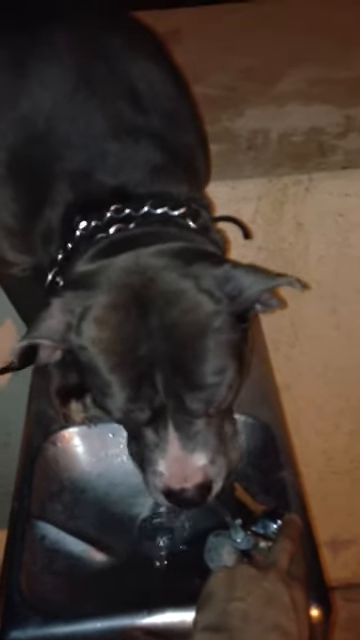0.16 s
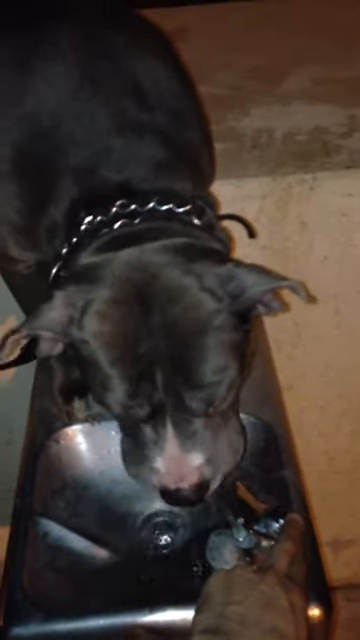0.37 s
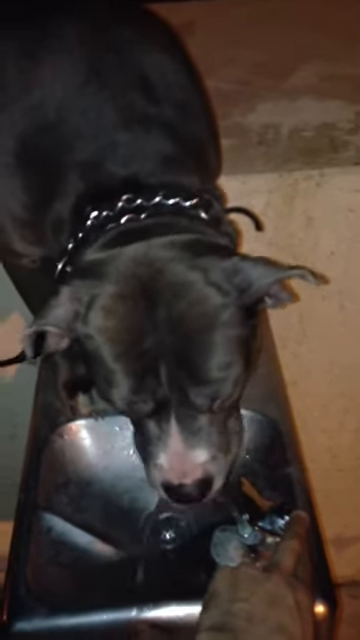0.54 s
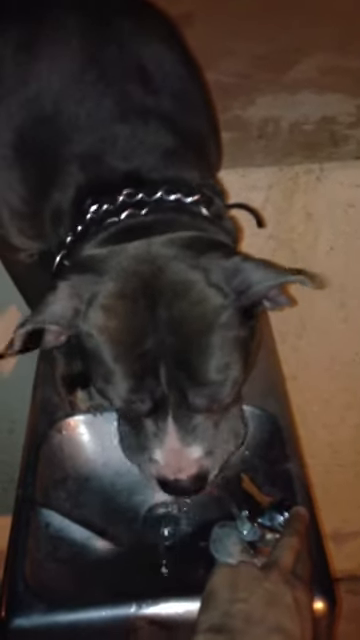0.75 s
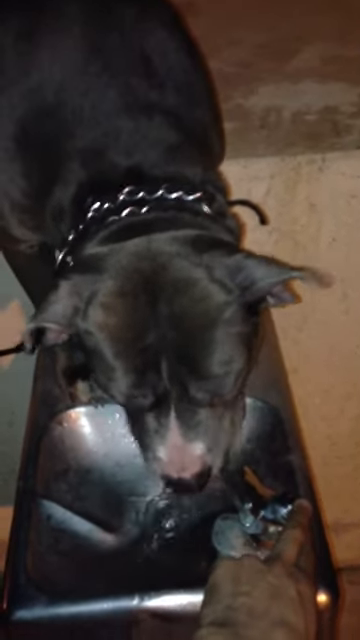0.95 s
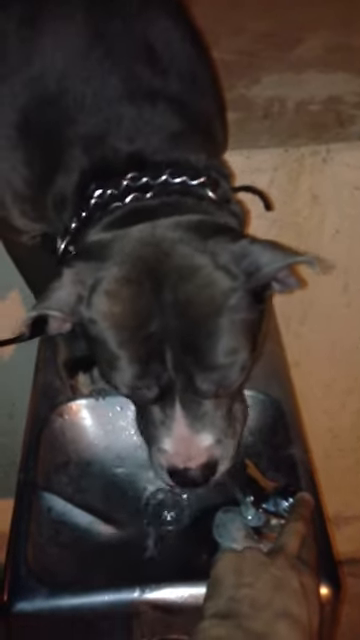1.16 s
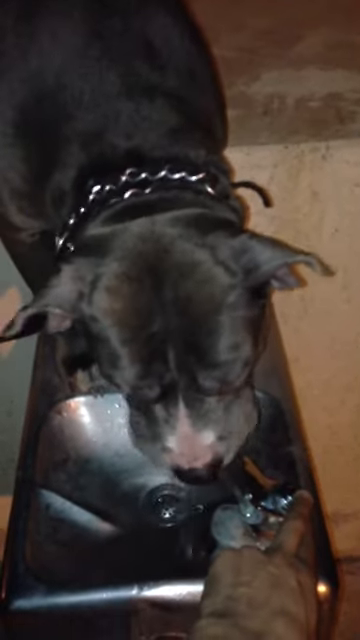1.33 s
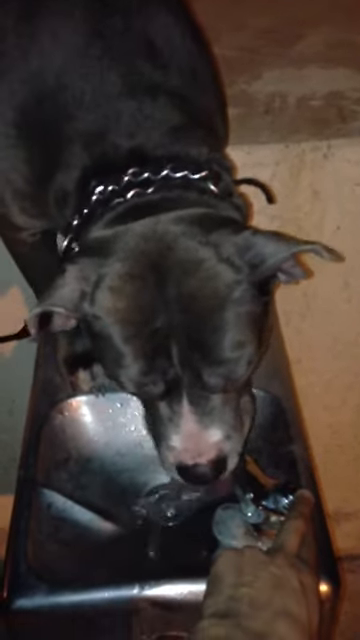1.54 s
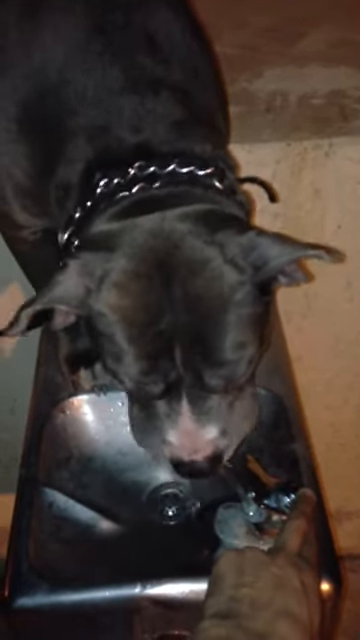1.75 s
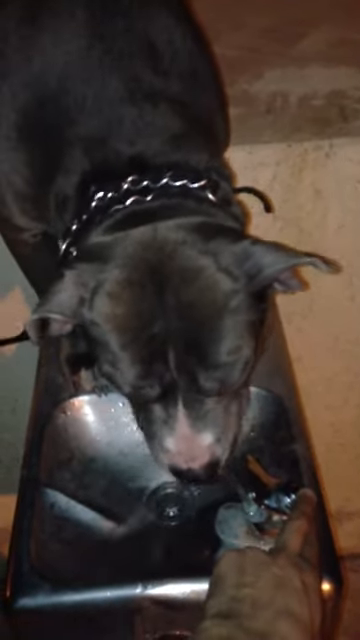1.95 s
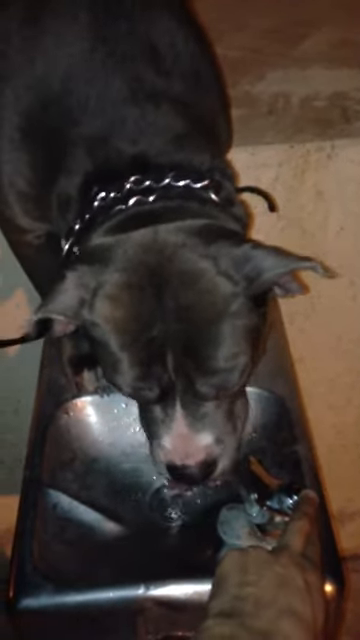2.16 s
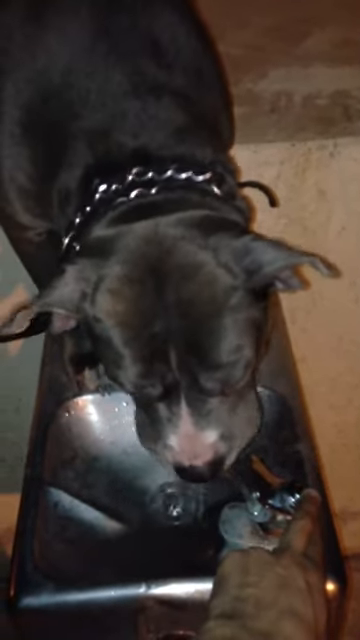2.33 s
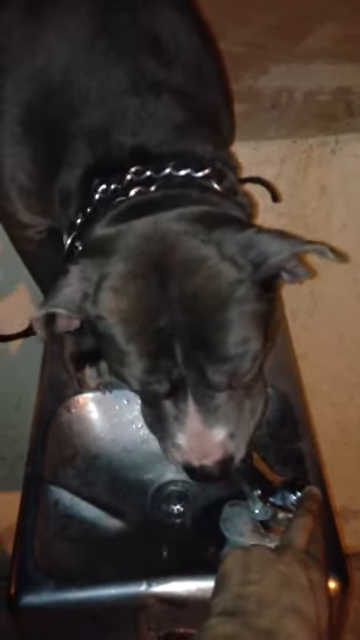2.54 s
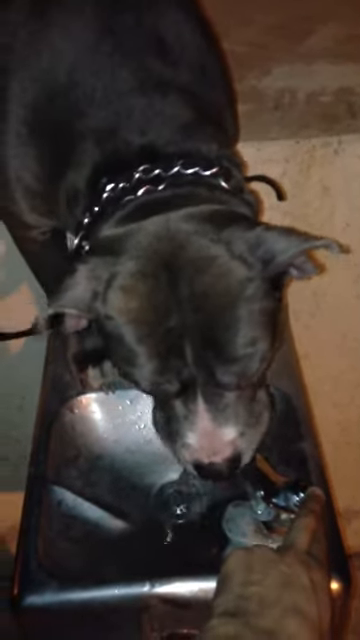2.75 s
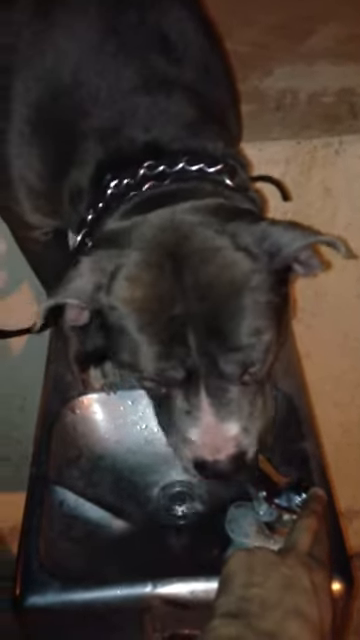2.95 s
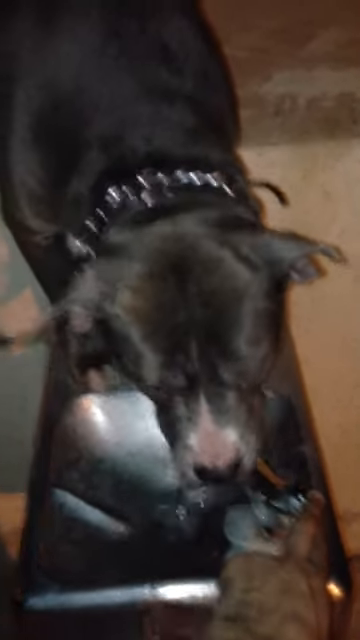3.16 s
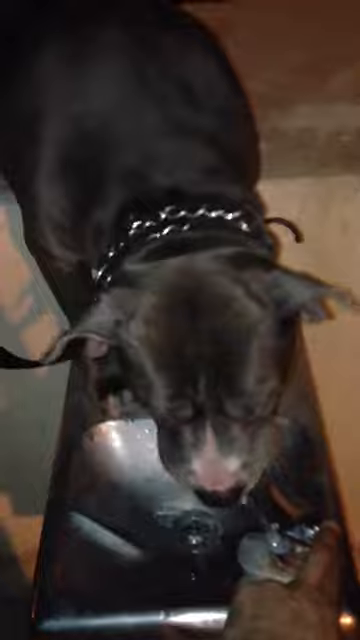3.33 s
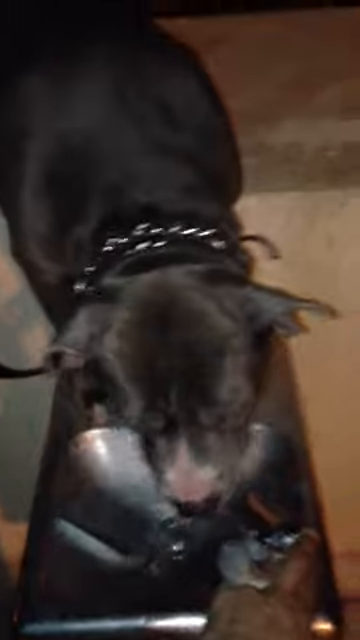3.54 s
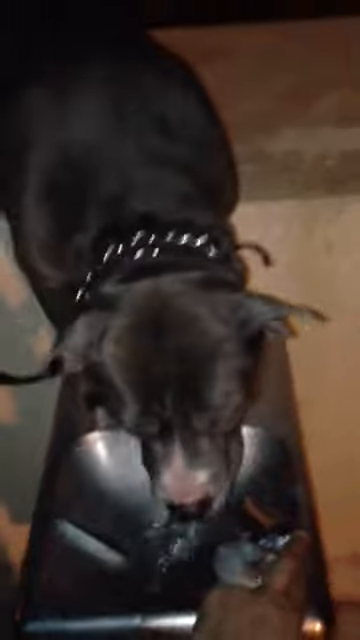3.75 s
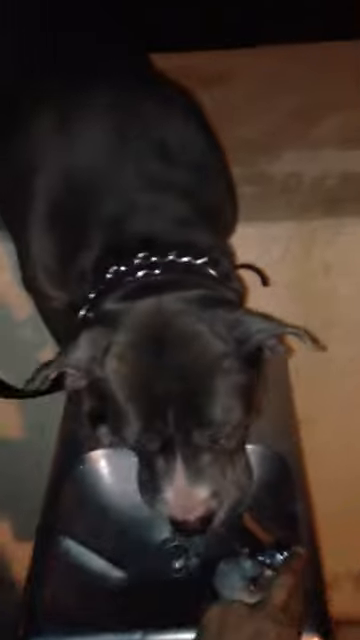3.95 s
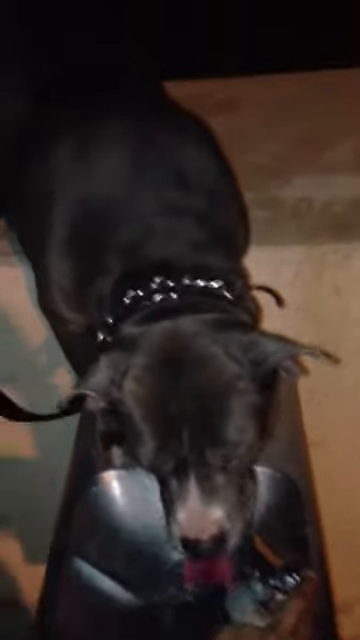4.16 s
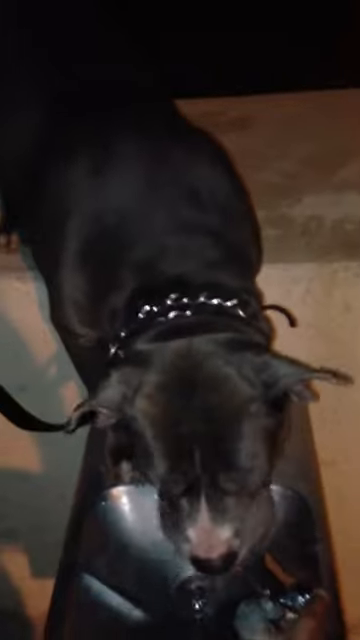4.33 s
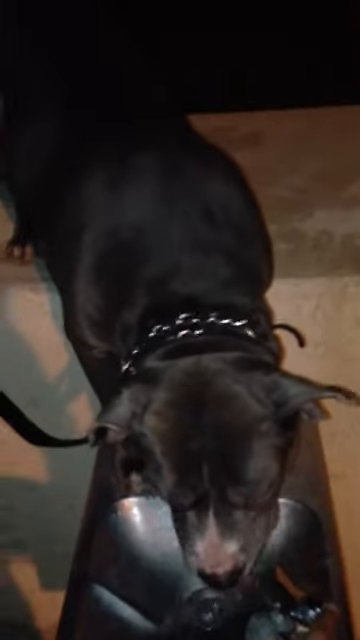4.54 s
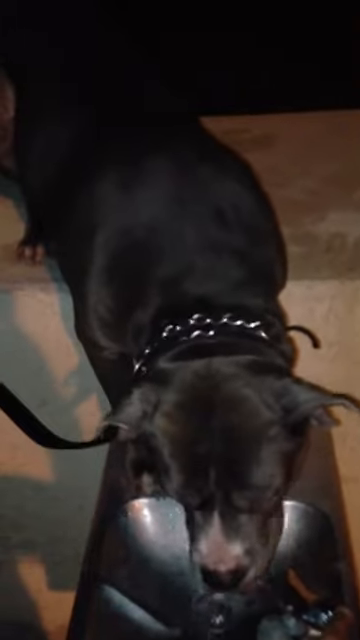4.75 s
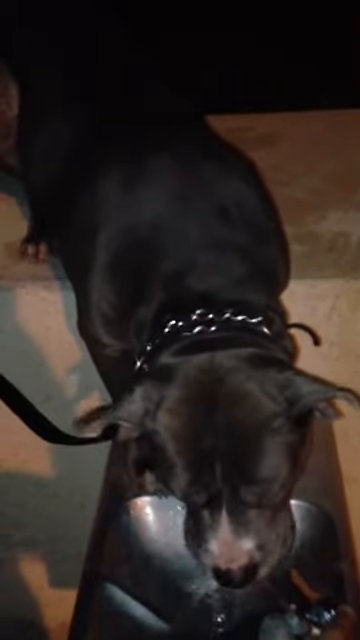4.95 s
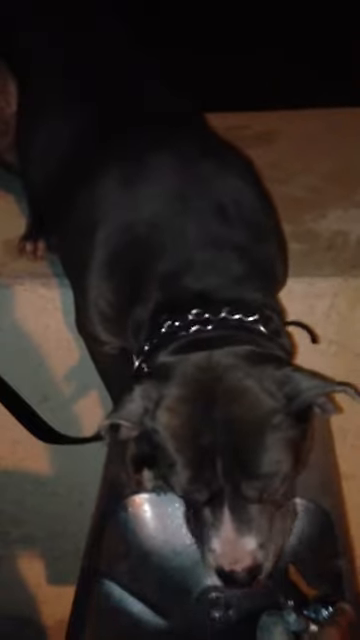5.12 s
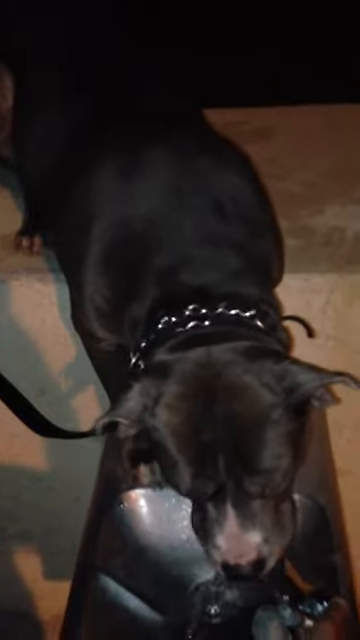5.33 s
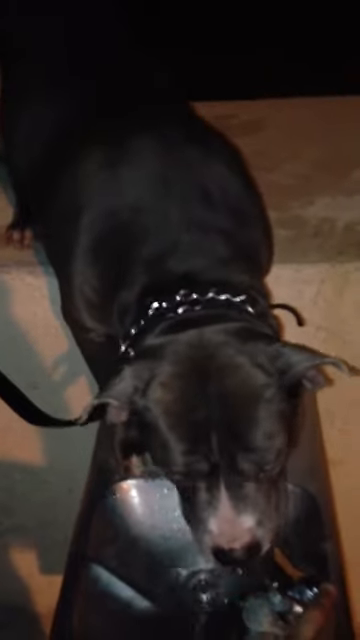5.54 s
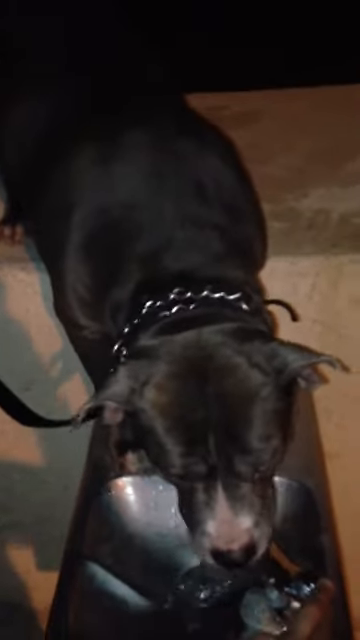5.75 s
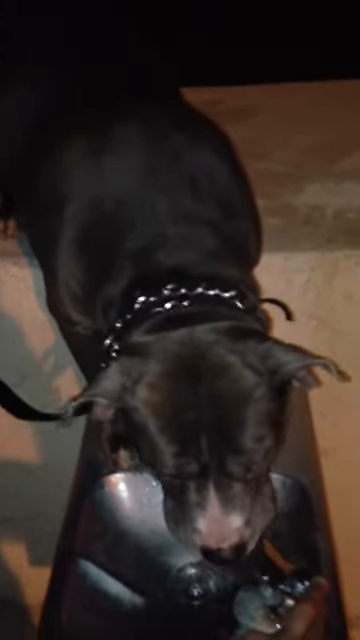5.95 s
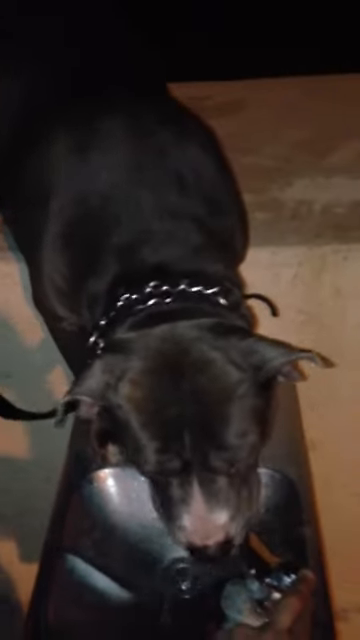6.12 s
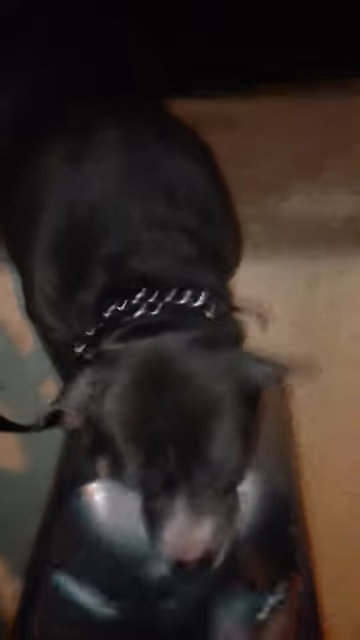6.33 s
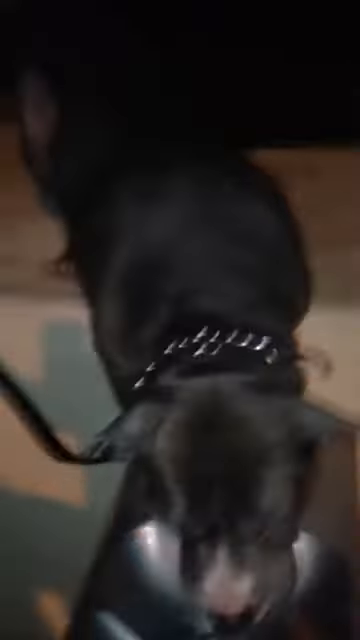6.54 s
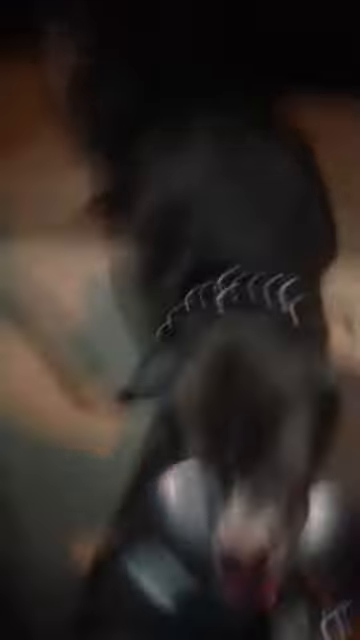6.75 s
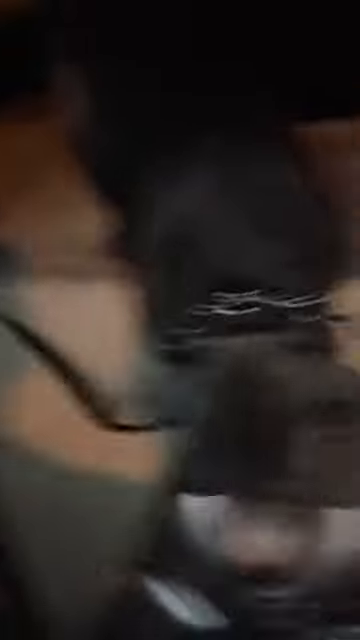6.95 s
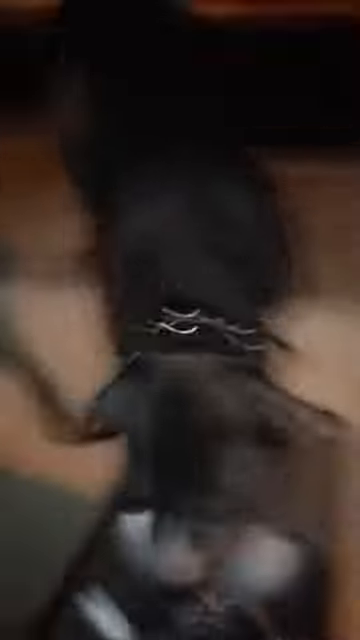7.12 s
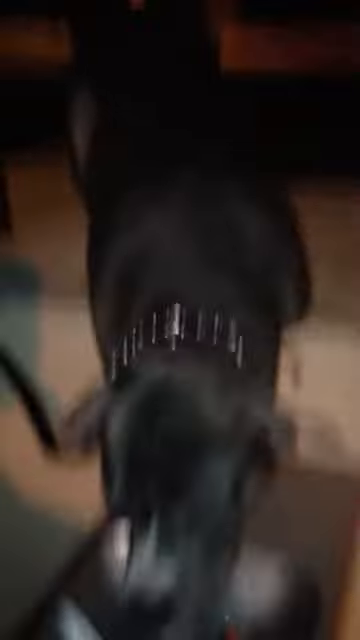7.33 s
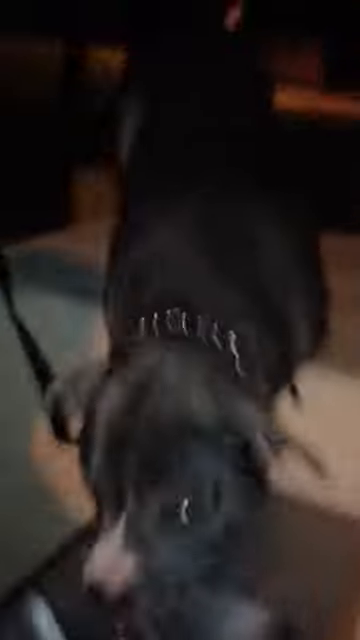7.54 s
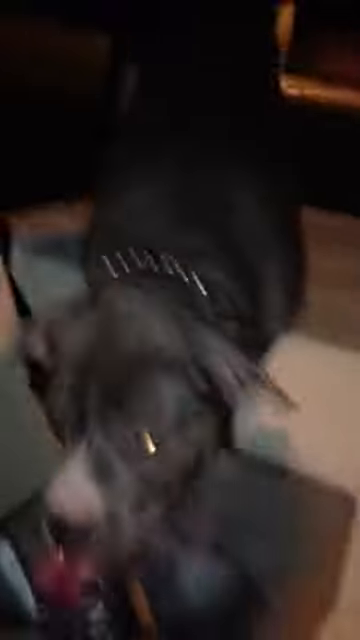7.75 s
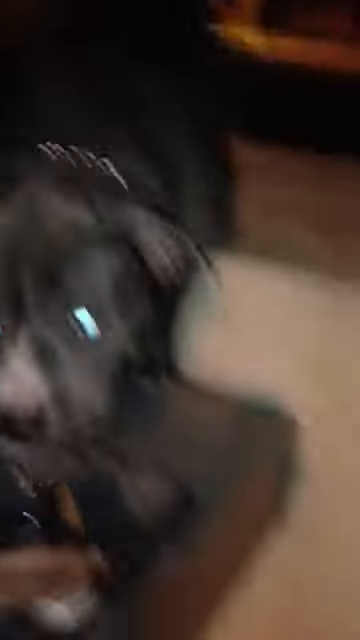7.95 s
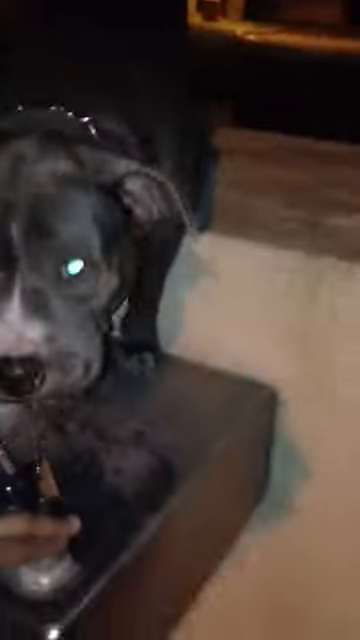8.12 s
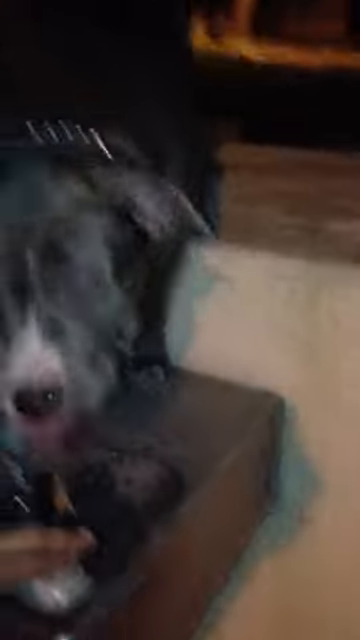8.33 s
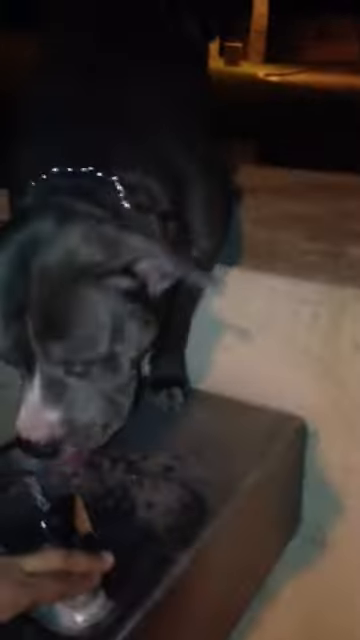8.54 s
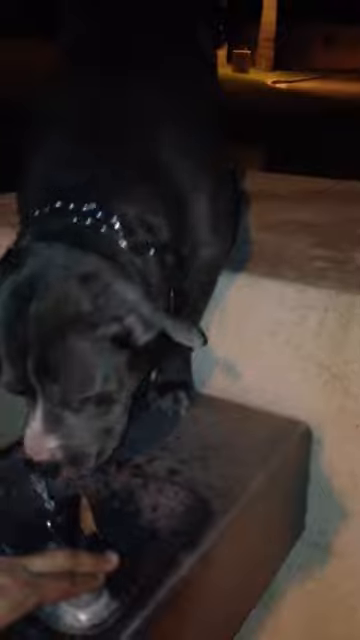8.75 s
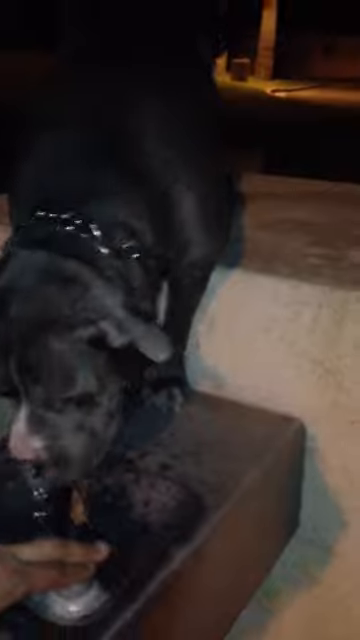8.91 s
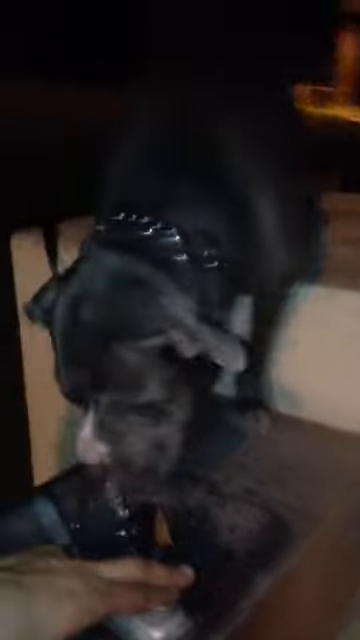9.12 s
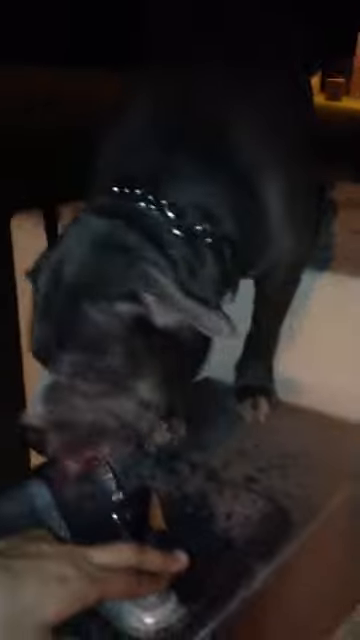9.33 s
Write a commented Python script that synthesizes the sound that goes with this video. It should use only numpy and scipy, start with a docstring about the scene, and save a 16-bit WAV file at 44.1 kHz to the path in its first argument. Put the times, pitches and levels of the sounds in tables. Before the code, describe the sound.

Close to the microphone, a dog laps about three times a second from a trickling steel basin outdoors: low plops, wet snaps, tiny splashes. A compressor whines and buzzes steadily over low hum and fan rumble. One hard, low plop stands out near seven seconds; then the microphone turns away, lapping and water dull, and a faint distant engine climbs in pitch.

```python
"""Dog lapping at a drinking fountain

A dog laps from a running steel fountain outdoors, close to one microphone that turns away near the end.
The compressor whines by repeating one turn's rattle; hum is sines, and the fan and jet are shaped noise.
About three times a second the tongue dips with a low plop of ringing air, then spatters drops and wet snaps.
Some laps stand out, the cabinet knocks softly, and late on a distant engine drones as a rising tone."""
import sys
import numpy as np
from scipy import signal
from scipy.fft import rfft, irfft
from scipy.io import wavfile

SR = 44100
rng = np.random.default_rng(int(sys.argv[2]) if len(sys.argv) > 2 else 0)


def output_pcm(signal):
    """Save a mono or channel-first signal as 16-bit PCM at the path in sys.argv[1].

    Samples are clipped to [-1, 1] before scaling.
    """
    pcm = np.clip(np.atleast_2d(signal).T, -1, 1) * 32767
    wavfile.write(sys.argv[1], SR, np.round(pcm).astype(np.int16))


N = 418068
TIME, FREQ = np.arange(N) / SR, np.fft.rfftfreq(N, 1 / SR)  # seconds, Hz
CUT_HZ = 15400  # upper band limit of the recorder
# the microphone turns away from the basin between these times
TURN_FROM_S, TURN_TO_S = 7.46, 7.95


def amp(db):
    """Turns decibels into a gain."""
    return 10 ** (np.asarray(db) / 20)


def unit(x):
    """Scales a sound to an rms of 1."""
    return x / np.sqrt(np.mean(x ** 2) + 1e-20)


def read(points, hz):
    """Reads a spectrum in dB, joining its points on a log-frequency axis."""
    f, db = np.transpose(points)
    return np.interp(np.log(hz + 1), np.log(f), db)


def curve(rows, axis=1):
    """Reads one column of a table over time, at every sample."""
    rows = np.asarray(rows)
    return np.interp(TIME, rows[:, 0], rows[:, axis])


def colour(x, db):
    """Filters by a gain in dB at each FREQ, then scales to an rms of 1."""
    return unit(irfft(rfft(x) * amp(db), N))


def drift(hz):
    """Random wavering no faster than a given rate, with an rms of 1."""
    return unit(irfft(rfft(rng.standard_normal(N)) * (FREQ < hz), N))


def add(mix, s, sound):
    """Mixes a sound in from a given time in seconds."""
    part = mix[max(round(s * SR), 0):][:len(sound)]
    part += sound[:len(part)]


def turned():
    """How far the microphone has turned from the basin, from 0 to 1."""
    return np.clip((TIME - TURN_FROM_S) / (TURN_TO_S - TURN_FROM_S), 0, 1)


# compressor: shaft speed, slip beat against the mains, and the time of one crest of that beat
SHAFT_HZ, BEAT_HZ, BEAT_AT_S = 29.179, 3.333, .035
# the dog's head comes between the microphone and the shell's upper resonance: start, and time taken
SHADE_FROM_S, SHADE_S = 7.82, 0.11
# shaft orders the shell rings with, before the shell's gain; each is moved to the nearest multiple
# of the shaft speed: (frequency [Hz], level [dB rms])
WHINE_ORDERS = [(1809, -73.5), (1838, -73.3), (1867, -74.6), (1896, -65), (1925, -64.3), (1954, -60.7),
                (1983, -58.2), (2013, -69.5), (2042, -71.0), (2158, -67.2), (2275, -72.0), (2771, -73.9),
                (2829, -72.6), (2946, -70.6), (3004, -71.7), (3033, -66.2), (3063, -68.8), (3121, -70.2),
                (3150, -56.8), (3179, -62.2), (3208, -65.9), (3267, -67.9), (3325, -73.6), (3442, -74.1),
                (3734, -73.9), (4025, -74.4), (4200, -74.1), (4638, -76), (4667, -71), (4697, -76),
                (6886, -73.5), (6913, -71.5)]
# outline of the weaker orders between them, relative levels: (frequency [Hz], level [dB])
BUZZ_ORDERS = [(300, -86), (480, -79), (650, -90), (880, -82), (1500, -90), (2200, -80), (2500, -84),
               (2900, -78), (3400, -77.5), (4100, -77), (5500, -86), (6900, -79.5), (8500, -93),
               (12000, -90), (15000, -93)]
# gain of the shell's two resonances, apart from the turn, the head, the beat and the wavering:
# (time [s], lower resonance [dB], upper resonance [dB])
SHELL_GAIN = [(0, 0, -0.5), (3.3, 1.5, 1), (4.5, 1, -1), (6.8, 0, -2.5), (7.4, -1, -3.5), (7.8, 0, -4)]


def compressor(buzz_db=-15.5, uneven_db=15.5, sway=0.0012, high_throb_db=2.5, waver_db=1.0, smear=0.23,
               low_away_db=-12, high_shade_db=-10.5, apart_turns=0.0012, apart_hz=1.2,
               low_rattles=8, high_rattles=4, channels=3):
    """Every turn rattles the shell alike; the slipping motor sways in speed and loudness."""
    beat = np.cos(2 * np.pi * BEAT_HZ * (TIME - BEAT_AT_S))
    speed = SHAFT_HZ * (1 + sway * beat + 0.00015 * drift(5.3))
    turns = np.cumsum(speed) / SR
    low_db = curve(SHELL_GAIN, axis=1) + low_away_db * turned()
    low = amp(low_db + waver_db * drift(6.0))
    shaded = np.clip((TIME - SHADE_FROM_S) / SHADE_S, 0, 1)
    high_db = curve(SHELL_GAIN, axis=2) + high_shade_db * shaded
    high = amp(high_db + high_throb_db * beat + waver_db * drift(13))

    order = np.arange(2049)
    hz = order * SHAFT_HZ
    upper = hz > 2600
    # a square-law phase spreads each turn into eight low rattles and four high ones: a shimmer and a buzz
    rattles = 3 * np.pi * order ** 2 / np.where(upper, high_rattles, low_rattles)
    phase = np.exp(1j * (rattles + smear * rng.standard_normal(len(hz))))
    uneven = rng.uniform(-1, 1, len(hz))
    weak = amp(read(BUZZ_ORDERS, hz) + buzz_db + uneven_db * uneven) * (hz > 250) * (hz < CUT_HZ)
    strong = np.zeros(len(hz))
    for line_hz, db in WHINE_ORDERS:
        k = round(line_hz / SHAFT_HZ)
        strong[k], weak[k] = amp(db), 0

    def spin(orders, late=0):
        """Repeats the rattle of one turn at the speed of the shaft."""
        turn = irfft(orders * phase, 2 ** 14, norm="forward") / np.sqrt(2)
        return np.interp((turns + late) % 1 * len(turn), np.arange(len(turn)), turn)

    # neighbouring orders ring different parts of the shell, so they waver apart and their beats come and go
    whine = np.zeros(N)
    for part in range(channels):
        own = strong * (order % channels == part)
        late = apart_turns * drift(apart_hz)
        whine += low * spin(own * ~upper, late) + high * spin(own * upper, late / 2)
    return whine + low ** 0.31 * spin(weak)


# mains hum, low shaft orders of the compressor, and faint fan tones, before hum_db and the wavering:
# (frequency [Hz], level [dB rms])
HUM_TONES = [(116.7, -70), (120, -58), (138.5, -67), (219, -65.5), (233.4, -65), (240, -67.5), (268, -66.5),
             (350.2, -69), (360, -61.5), (439, -71), (467, -71)]
# outline of the fan rumble, relative levels: (frequency [Hz], level [dB])
FAN_SPECTRUM = [(20, -32), (50, -16.5), (85, -11.5), (125, -3.5), (190, 3.5), (250, -0.5), (320, -5),
                (410, -11), (520, -14), (700, -15.5), (1500, -24.5), (5000, -81)]
# narrow bands from the cabinet that come through as the microphone turns, before side_db:
# (centre [Hz], width [Hz], level [dB rms])
SIDE_TONES = [(105, 30, -68.5), (277, 17, -67), (450, 16, -66.5), (586, 20, -70), (792, 34, -69),
              (2850, 110, -70.5), (6860, 300, -66.5), (10480, 120, -71)]


def fan(fan_db=-52.5, hum_db=-1.74, side_db=-1.2, vary_db=1.0, waver_db=2.0, hum_away_db=-2.5,
        deep_db=-4, deep_away_db=4, deep_vary_db=3.0, deep_hz=75):
    """Air rumbles over a wavering hum; its deep bass varies in level, and the turn brings in other tones."""
    air = colour(rng.standard_normal(N), read(FAN_SPECTRUM, FREQ))
    deep = irfft(rfft(air) / (1 + (FREQ / deep_hz) ** 10), N)
    rest = (air - deep) * amp(vary_db * drift(8.6))
    deep_level_db = deep_db + deep_away_db * turned() + deep_vary_db * np.minimum(drift(9), 2)
    rumble = amp(fan_db) * (rest + deep * amp(deep_level_db))

    hum = np.zeros(N)
    for hz, db in HUM_TONES:
        level = amp(db + hum_db + waver_db * drift(3)) * np.sqrt(2)
        hum += level * np.sin(2 * np.pi * hz * TIME + 0.78 * drift(1.3))

    side = np.zeros(N)
    for hz, width, db in SIDE_TONES:
        peak_db = -20 * np.log10(1 + (2 * (FREQ - hz) / width) ** 2)
        side += amp(db) * colour(rng.standard_normal(N), peak_db)
    return rumble + amp(hum_away_db * turned()) * hum + amp(side_db) * side * turned()


# outline of the trickling water, relative levels: (frequency [Hz], level [dB])
WATER_SPECTRUM = [(200, -19), (600, -5), (1100, 4.5), (1500, 1.5), (2400, 0), (3600, -1), (4500, -1),
                  (5600, -2), (7300, 1.5), (8600, -5), (11500, -2), (14000, -7), (15200, -3)]
# resonances of the cabinet and steel basin, relative levels: (centre [Hz], width [Hz], level [dB])
BASIN_MODES = [(374, 182, 13.5), (839, 45, 10.5), (1960, 184, 14), (3060, 1430, 6), (3960, 89, 7),
               (6810, 90, 5.5)]


def trickle(wash_db=-52.5, drops_db=-59.0, ring_db=-53.5, drops_per_s=900, spread_db=-0.5, flutter_db=1.14,
            swell_db=0.14, dull_db=-3, jet_away_db=-1.5, ring_away_db=-7.0):
    """The jet hisses and breaks into tiny drops; the steel basin rings under water and motor."""
    size = amp(spread_db * np.minimum(rng.exponential(1, N), 4.5)) * rng.choice([-1, 1], N)
    falls = rng.random(N) < drops_per_s / SR
    drops = colour(size * falls, read(WATER_SPECTRUM, FREQ))
    wash = colour(rng.standard_normal(N), read(WATER_SPECTRUM, FREQ)) * amp(flutter_db * drift(40))
    water = amp(wash_db) * wash + amp(drops_db) * drops
    # the top of the hiss is lost first when the microphone points elsewhere
    fizz = irfft(rfft(water) / (1 + (8500 / (FREQ + 1)) ** 4), N)
    water = water + (amp(dull_db * turned()) - 1) * fizz
    jet = amp(swell_db * drift(0.67) + jet_away_db * turned())

    modes = sum(amp(db) / (1 + (2 * (FREQ - hz) / width) ** 2) for hz, width, db in BASIN_MODES)
    ring = colour(rng.standard_normal(N), 20 * np.log10(modes))
    return jet * water + amp(ring_db + ring_away_db * turned()) * ring


def bubbles(level_db=-55, spread_db=3.0, cycles=4, low_hz=2700, high_hz=11000, away_db=-6, count=300):
    """Tiny bubbles burst where the jet lands, each a short ping that swells and dies."""
    out, t = np.zeros(N), np.arange(900) / SR
    for when, pitch, size in rng.random((count, 3)):
        hz = low_hz * (high_hz / low_hz) ** pitch
        u = t * hz / cycles  # reaches 1 at the loudest moment
        db = level_db + spread_db * min(-np.log(1 - size), 3)
        add(out, when * N / SR, amp(db) * u * np.exp(1 - u) * np.sin(2 * np.pi * hz * t))
    return out * amp(away_db * turned())


def plop(db, hz, rise, over_hz, over_db, glide=0.004, wet_db=-14):
    """An air pocket swells into a few cycles of ringing, roughened by the water around it."""
    t = np.arange(2200) / SR
    u = t / rise  # reaches 1 at the loudest moment
    clock = np.cumsum(1 + glide * (np.minimum(u, 3) - 1)) / SR  # the pitch rises very slightly
    band = signal.butter(2, [hz * 0.84, min(hz * 0.99, CUT_HZ)], "band", fs=SR, output="sos")
    wet = unit(signal.sosfilt(band, rng.standard_normal(len(t))))
    ring = -np.sin(2 * np.pi * hz * clock) + amp(over_db) * np.sin(2 * np.pi * over_hz * clock)
    return amp(db) * (u * np.exp(1 - u)) ** 2 * (ring + amp(wet_db) * wet)


def splash(length, db, hz, level_db=-1, spread_db=2.0, drops_per_s=2500):
    """A cloud of droplets of uneven size swells and thins out."""
    count = SR // 4
    size, chance, sign = rng.exponential(1, count), rng.random(count), rng.choice([-1, 1], count)
    drops = sign * amp(spread_db * np.minimum(size, 4)) * (chance < drops_per_s / SR)
    band = signal.butter(2, [hz * .5, min(hz * 1.1, CUT_HZ)], "band", fs=SR, output="sos")
    cloud = unit(signal.sosfilt(band, drops))[:round(length * SR)]
    return amp(db + level_db) * cloud * np.sin(np.linspace(0, np.pi, len(cloud)))


# the beat of the tongue: time of one lap, and the first time it cuts the jet
LAP_S, FIRST_LAP_S = .324, .118
# the tongue dips this long before it cuts the jet; each lap is a little early or late
DIP_LEAD_S, LAP_JITTER_S = 0.11, .007


def lapping(dip_db=-50, dip_hz=1030, dip_rise_s=0.0019, jaw_hz=520, jaw_db=-1, spatter_db=-54.5,
            spatter_hz=4300, spatter_s=0.051, vary_octaves=0.21, away_db=-20.0):
    """An ordinary lap: the tongue dips with a low plop, then spatters through the jet."""
    out, beats = np.zeros(N), np.arange(FIRST_LAP_S, N / SR, LAP_S)
    loud = np.array([row[0] for rows in (PLOPS, SMACKS, GLUGS) for row in rows])
    chances = np.clip(rng.standard_normal((len(beats), 2)), -1.5, 1.5)
    for beat, (late, pocket) in zip(beats, chances):
        s = beat + LAP_JITTER_S * late
        pitch = 2 ** (vary_octaves * pocket)
        add(out, s - spatter_s / 2, splash(spatter_s, spatter_db, spatter_hz))
        when = s - DIP_LEAD_S
        # a loud plop, smack or glug close by takes the place of the ordinary dip
        if when > 0 and abs(loud - when).min() > LAP_S / 10:
            add(out, when, plop(dip_db, dip_hz * pitch, dip_rise_s, jaw_hz * pitch, jaw_db))
    return out * amp(away_db * turned())


def smack(db, hz, level_db=-6, decay=0.0023, spray_db=-21, spray_decay=0.12, crack_db=-1, crack_decay=0.00016):
    """A film of water snaps with a bright crack, and a little spray follows."""
    t = np.arange(3000) / SR
    band = signal.butter(1, [hz * 0.56, min(hz * 1.31, 19000)], "band", fs=SR, output="sos")
    fizz = unit(signal.sosfilt(np.vstack([band, band]), rng.standard_normal(len(t))))
    bright = unit(np.diff(rng.standard_normal(len(t) + 1)))
    crack = bright * amp(crack_db) * np.exp(-t / crack_decay)
    body = fizz * (np.exp(-t / decay) + amp(spray_db) * np.exp(-t / spray_decay))
    return amp(db + level_db) * (body + crack)


def glug(db, start_hz, end_hz, decay, swell_s=0.0032, settle_s=0.0053):
    """A bubble under the tongue rings and grows, so that its pitch sinks."""
    t = np.arange(4000) / SR
    hz = end_hz + (start_hz - end_hz) * np.exp(-t / settle_s)
    swell = 1 - np.exp(-(t / swell_s) ** 2)
    return amp(db) * swell * np.exp(-t / decay) * np.sin(2 * np.pi * np.cumsum(hz) / SR)


# the levels in these four tables set loudness; each sound's own envelope and trim then act on them
# air pockets closed by tongue and jaw: (time [s], level [dB], pocket pitch [Hz], time to the peak [s],
# overtone [Hz], overtone level against the pocket [dB])
PLOPS = [ (.073, -47, 6100, 0.0022, 3880, 3), (.223, -44, 1050, 0.0028, 3160, -14),
         (.4295, -36, 3680, 0.0013, 2380, -8), (.4335, -46, 2100, .003, 5950, -5),
         (0.7568, -35, 1900, 0.0028, 3320, -12), (0.7642, -39, 3400, 0.0017, 2000, -3),
         (.9808, -35, 1100, 0.0029, 1660, -9), (1.003, -42, 1630, 0.0035, 2250, -6),
         (1.017, -35.5, 2090, 0.0033, 2380, -14), (1.118, -40, 2370, .0023, 6000, -6),
         (1.42, -43, 3660, 0.0029, 2120, 0), (1.7498, -36.5, 3350, 0.0015, 4820, -7),
         (1.7563, -35, 3430, 0.0029, 7300, -13), (1.965, -41.5, 990, 0.0029, 4820, -8),
         (2.05, -46, 560, .003, 1200, -12), (2.076, -45, 3700, 0.0018, 4400, -5),
         (2.353, -42, 1150, 0.0028, 520, -0.5), (2.66, -46, 1210, 0.0042, 2700, -10),
         (2.917, -39.5, 3690, 0.002, 1890, -12), (3.032, -38.5, 3440, 0.0017, 1910, 1),
         (3.039, -35, 3370, 0.0023, 1930, -8), (3.111, -36, 2010, 0.002, 2800, -18),
         (3.208, -44, 2680, .0022, 1460, -6), (3.248, -45.5, 960, .003, 3250, -6),
         (3.382, -45, 2780, .002, 4100, -3), (3.398, -41, 3790, .0018, 4500, -1),
         (3.477, -43, 2150, 0.0025, 4250, -8), (3.644, -43, 4070, .002, 1500, -10),
         (3.696, -40, 2120, .0017, 4200, -2), (3.7284, -36.5, 3000, 0.0012, 1510, -2),
         (4, -29, 2030, 0.0032, 3850, -5.5), (4.331, -37.5, 3370, 0.0016, 5400, -18),
         (4.338, -39, 3420, .0018, 6300, -12), (4.4023, -37, 2010, 0.0031, 3600, -2),
         (4.403, -37, 2850, 0.002, 4200, -4), (4.519, -42, 570, 0.0049, 1520, -12),
         (4.539, -40, 1860, 0.0013, 1100, -2), (4.543, -39.5, 910, 0.0038, 1400, -18),
         (4.745, -44, 5500, 0.0014, 5950, -6), (4.973, -42, 2210, 0.0034, 6100, -6),
         (5.213, -45, 520, 0.0043, 1100, -12), (5.274, -33, 1980, 0.0027, 2450, -11),
         (5.454, -32, 3850, 0.0014, 1620, -6), (5.647, -42, 520, 0.0033, 1190, -16),
         (5.943, -41, 5270, 0.0023, 506, 1), (6.238, -45, 536, 0.0034, 4900, -7),
         (6.8025, -15.5, 454, 0.0021, 855, -23), (6.821, -52, 553, 0.0034, 1000, -9),
         (6.903, -37, 4900, 0.0018, 6500, -4), (6.974, -38.5, 2180, 0.0013, 2840, -6),
         (7.067, -47, 4620, .0024, 3180, -2), (7.09, -31.5, 3050, 0.00062, 4000, -18),
         (7.1203, -30, 1045, 0.0024, 1390, -4), (7.227, -36, 300, 0.0014, 520, -12),
         (7.429, -45, 4400, .002, 5100, -4), (7.449, -39, 537, 0.0053, 800, -18),
         (7.461, -43.5, 554, 0.0074, 1300, -19), (7.486, -44, 1020, 0.0024, 1490, -1),
         (7.551, -47, 940, 0.0063, 1700, -19.5), (7.668, -42, 3700, 0.0031, 4300, -5),
         (7.864, -47, 3950, .0016, 2000, -12), (8.147, -44, 2600, .003, 5750, -9),
         (8.177, -38, 2760, 0.0013, 1620, -0.5), (8.426, -41, 1300, 0.0013, 2050, -6),
         (8.4329, -35, 1650, 0.001, 2200, -10), (8.4343, -29.5, 1500, 0.0025, 5030, -19),
         (8.437, -44, 790, .002, 2400, -3), (8.582, -46.5, 1750, 0.0051, 5760, -6)]
# large bubbles that ring on and sink in pitch:
# (time [s], level [dB], start pitch [Hz], settled pitch [Hz], decay [s])
GLUGS = [(1.003, -29.5, 1000, 860, 0.013), (4.854, -22.5, 1000, 850, 0.0061)]
# snaps of wet film on tongue and lips: (time [s], level [dB], centre [Hz])
SMACKS = [ (.126, -44, 4200), (0.431, -38, 4200), (.579, -37, 4600), (.98, -35, 2600), (1.005, -36, 1900),
          (1.041, -41, 12000), (1.115, -40, 5400), (1.757, -40, 5500), (1.827, -39, 5300),
          (1.933, -39, 9000), (1.9405, -37, 15000), (1.965, -37, 7500), (2.354, -32, 6540),
          (2.355, -40, 13000), (2.377, -40, 8000), (2.393, -31, 5500), (2.701, -36, 3800),
          (3.04, -35, 8000), (3.233, -36, 5200), (3.349, -36, 4700), (3.379, -34, 9500), (3.69, -33, 4300),
          (3.7295, -37, 4600), (3.945, -34, 4300), (4.001, -31, 3950), (4.405, -40, 3200),
          (5.039, -37, 5000), (5.277, -31.5, 3500), (5.324, -42, 9000), (5.635, -39, 10500),
          (6.0, -39, 5200), (6.291, -41, 6000), (6.534, -38, 13000), (6.594, -38, 3180),
          (6.8023, -36, 1400), (6.903, -28, 5800), (8.436, -47, 6400)]
# larger splashes on the steel: (time [s], length [s], level [dB], centre [Hz])
SPLASHES = [ (.36, 0.059, -51, 4500), (.426, 0.02, -49, 3700), (0.755, .035, -53, 3600),
            (0.975, 0.027, -46, 1900), (0.999, .026, -50, 2000), (1.11, 0.022, -43.5, 3730),
            (1.406, 0.023, -46, 3600), (1.747, 0.019, -46, 4400), (1.767, 0.065, -58, 5500),
            (2.325, 0.057, -50, 5500), (3.023, 0.028, -51, 4500), (3.627, 0.14, -59, 4000),
            (3.997, 0.012, -44, 3200), (4.324, 0.022, -46, 5530), (4.519, 0.26, -55, 550),
            (5.253, 0.04, -47, 3800), (5.45, 0.015, -49, 3000), (5.97, 0.048, -47.5, 4480),
            (6.901, 0.11, -54, 3400), (7.3, 0.31, -50, 3560), (7.378, 0.15, -51, 1210),
            (7.605, 0.029, -50, 5000), (7.75, 0.032, -52, 6000), (8.144, 0.066, -52.5, 2600),
            (8.428, 0.026, -47, 1880), (8.57, 0.029, -52, 5200), (8.579, 0.1, -55.5, 4000),
            (8.696, .05, -54.5, 4500), (9.428, 0.059, -52, 3600)]


def loud_laps():
    """The plops, glugs, smacks and splashes that stand out from the steady lapping."""
    out = np.zeros(N)
    for sound, rows in (plop, PLOPS), (glug, GLUGS), (smack, SMACKS), (splash, SPLASHES):
        for s, *shape in rows:
            add(out, s, sound(*shape))
    return out


def wet_lips(snap_db=-44, vary_db=3.0, low_hz=4200, high_hz=12000, scatter_s=.055, away_db=-10.0, count=2):
    """Faint snaps of wet film scatter around each lap."""
    out, beats = np.zeros(N), np.repeat(np.arange(FIRST_LAP_S, N / SR, LAP_S), count)
    for beat, (late, size), pitch in zip(beats, rng.standard_normal((len(beats), 2)), rng.random(len(beats))):
        hz = low_hz * (high_hz / low_hz) ** pitch
        add(out, beat + scatter_s * late, smack(snap_db + vary_db * min(size, 2), hz))
    return out * amp(away_db * turned())


# soft knocks on the cabinet: (time [s], peak level [dB], pitch [Hz], time to the peak [s])
KNOCKS = [(0.464, -38, 265, 0.0032), (0.477, -37.5, 250, 0.0063), (4.038, -40, 260, 0.0023),
          (4.057, -41, 298, 0.0074), (4.852, -36, 380, 0.0013), (5.36, -45.5, 165, 0.016),
          (5.6, -43.5, 210, 0.015)]


def knocks():
    """A panel of the cabinet flexes and rings low for a few cycles."""
    out, t = np.zeros(N), np.arange(4000) / SR
    for s, db, hz, rise in KNOCKS:
        swell = (t / rise * np.exp(1 - t / rise)) ** 2
        add(out, s, amp(db) * swell * np.sin(2 * np.pi * hz * t))
    return out


# a distant engine pulls away, levels before level_db and the wavering:
# (time [s], firing rate [Hz], level [dB])
ENGINE = [(7.3, 78, -81), (7.9, 86, -58), (8.25, 90, -65), (8.55, 95, -56), (8.85, 102, -68),
          (9.12, 108, -56), (9.45, 112, -74)]


def far_engine(level_db=-2.5, waver_db=1.0, wobble=0.038):
    """A low drone and its equally strong octave climb as a distant vehicle gathers speed."""
    firing_hz = curve(ENGINE, axis=1) * (1 + wobble * drift(14))
    phase = 2 * np.pi * np.cumsum(firing_hz) / SR
    level = amp(curve(ENGINE, axis=2) + level_db + waver_db * drift(8.8)) * (TIME > ENGINE[0][0])
    return level * np.sqrt(2) * (np.sin(phase) + np.sin(2 * phase))


def basin_echo(x, echo_db=-19, t60=0.099):
    """The walls of the basin return a short scatter, fading by 60 dB in t60 seconds."""
    t = np.arange(4000) / SR
    tail = rng.standard_normal(len(t)) * amp(-60 * t / t60) * (t > .002)
    return x + amp(echo_db) * signal.oaconvolve(x, tail / np.linalg.norm(tail))[:N]


def scene():
    """All sources reach one microphone; the splashes, plops and bubbles carry no deep bass."""
    thin = signal.butter(2, 130, "high", fs=SR, output="sos")
    water = signal.sosfilt(thin, loud_laps() + lapping() + wet_lips() + bubbles())
    mono = compressor() + fan() + far_engine() + trickle() + knocks() + basin_echo(water)
    return np.array([mono, mono])


def record(dry):
    """The recorder cuts off the highest treble with a steep filter."""
    edge = signal.firwin(511, CUT_HZ, window=("kaiser", 9), fs=SR)
    return signal.oaconvolve(dry, edge[None], "same")


dry = scene()
out = record(dry)
output_pcm(out)
```